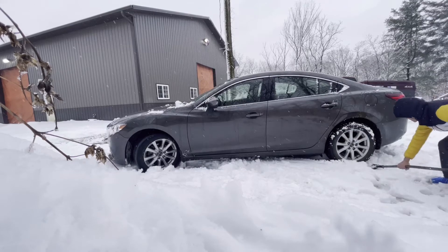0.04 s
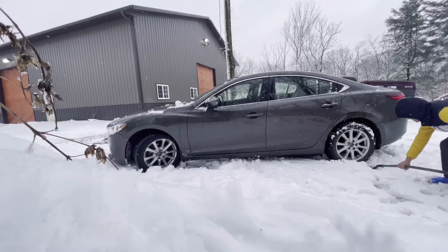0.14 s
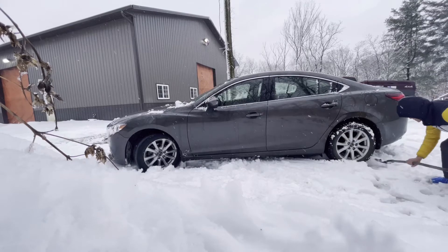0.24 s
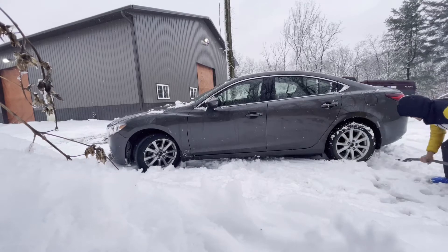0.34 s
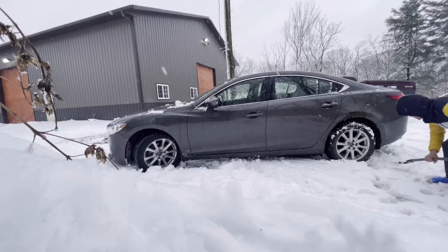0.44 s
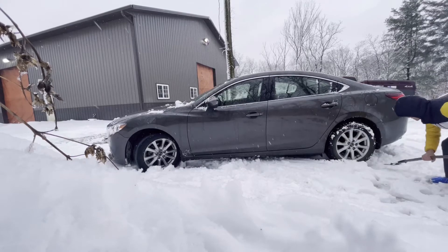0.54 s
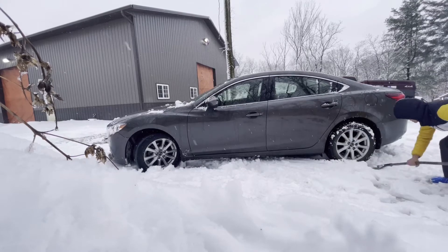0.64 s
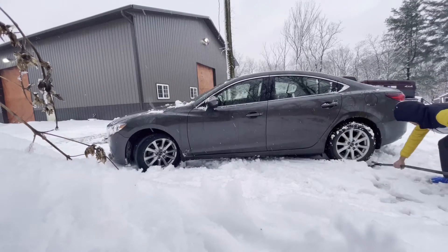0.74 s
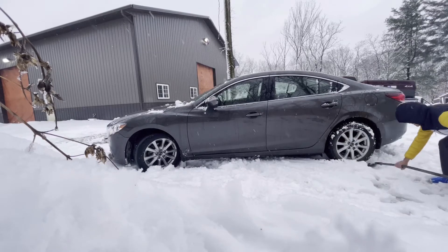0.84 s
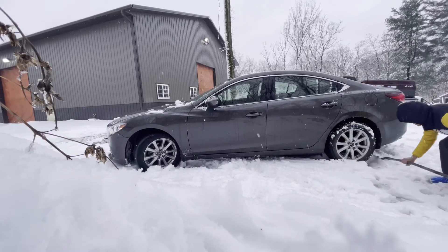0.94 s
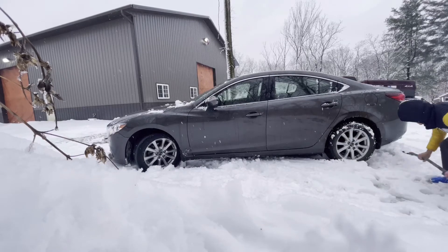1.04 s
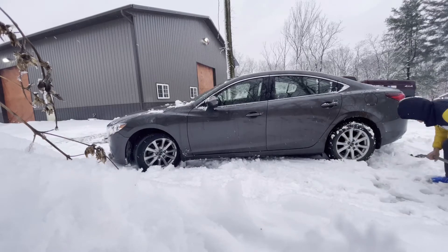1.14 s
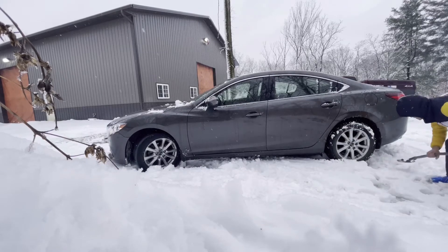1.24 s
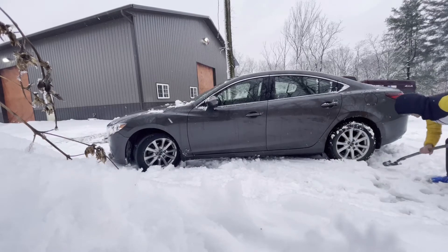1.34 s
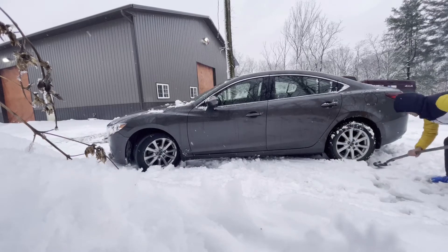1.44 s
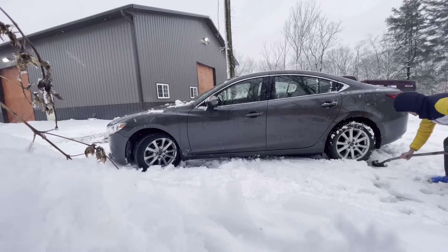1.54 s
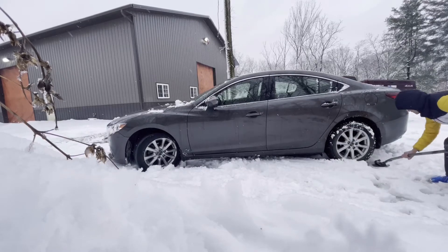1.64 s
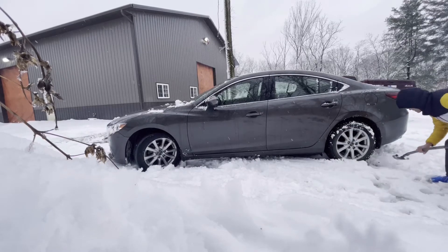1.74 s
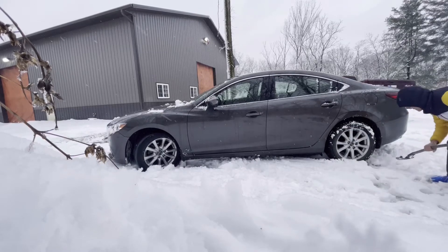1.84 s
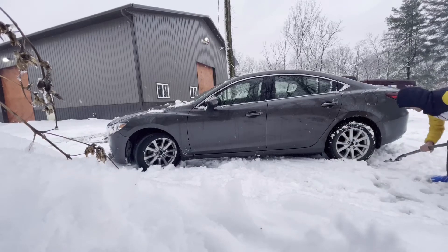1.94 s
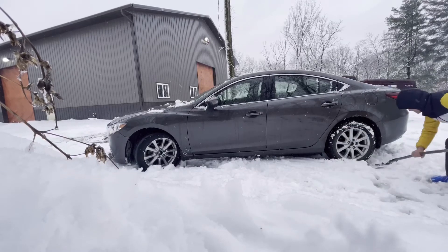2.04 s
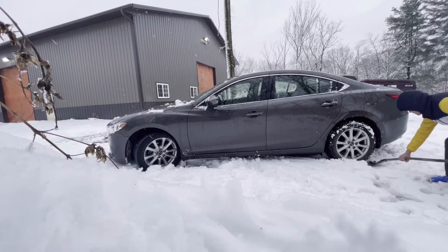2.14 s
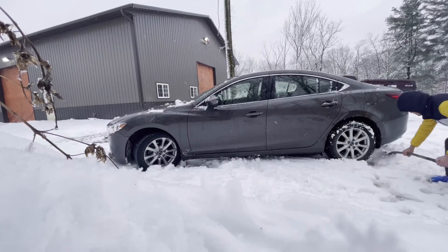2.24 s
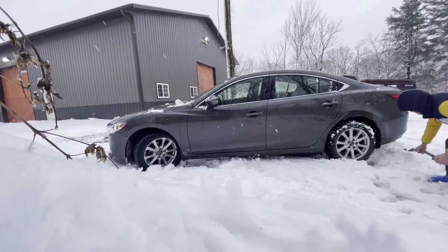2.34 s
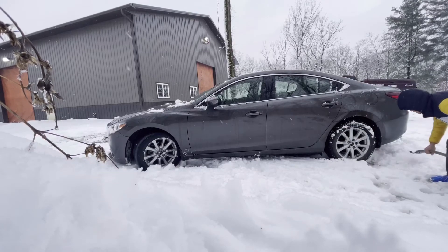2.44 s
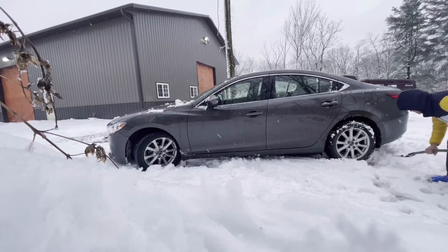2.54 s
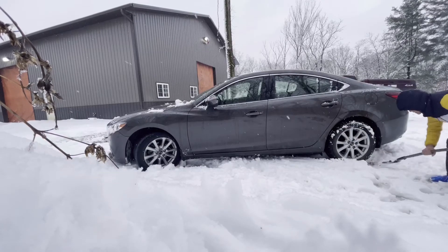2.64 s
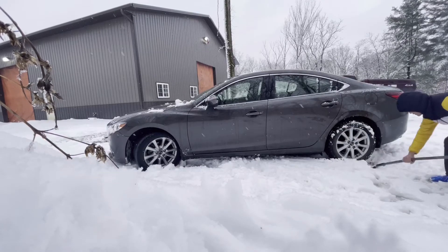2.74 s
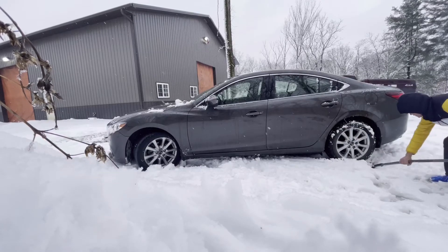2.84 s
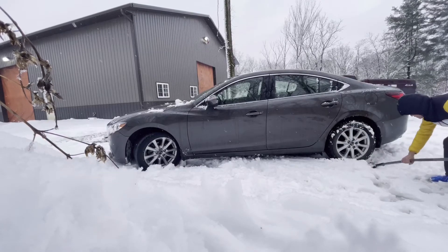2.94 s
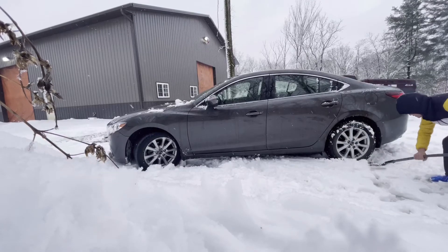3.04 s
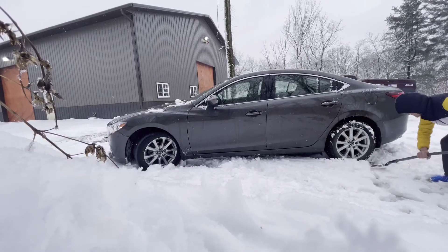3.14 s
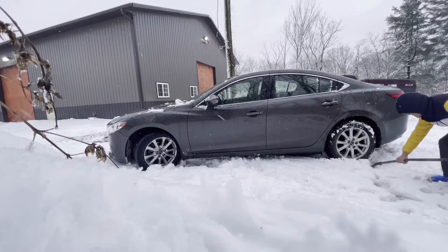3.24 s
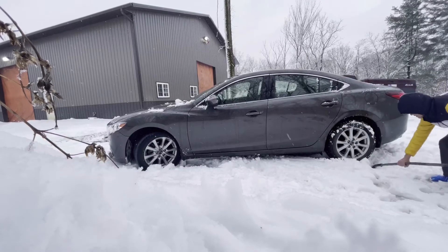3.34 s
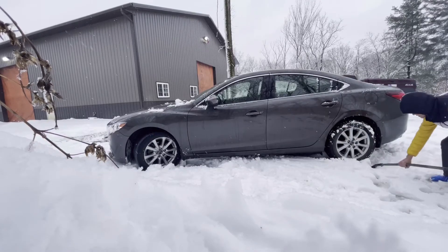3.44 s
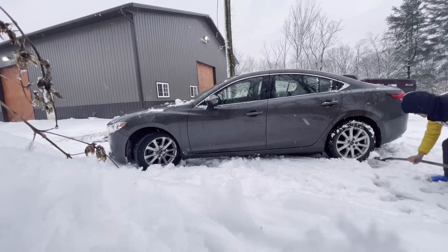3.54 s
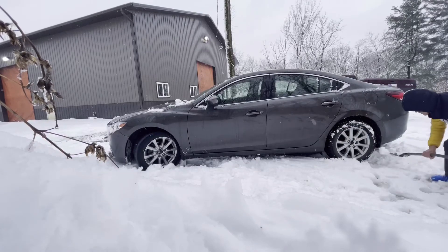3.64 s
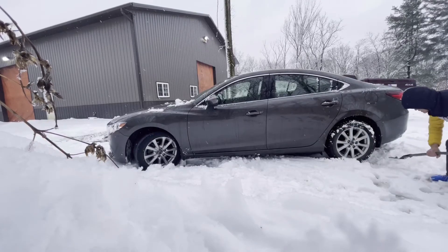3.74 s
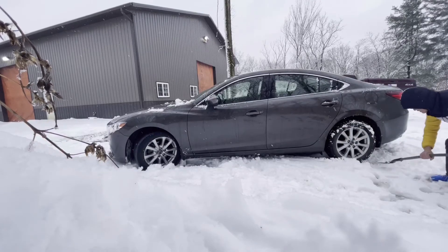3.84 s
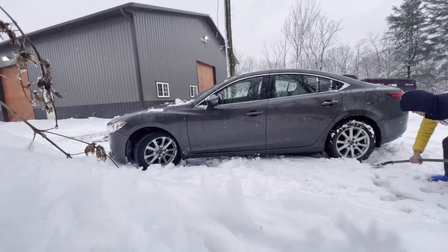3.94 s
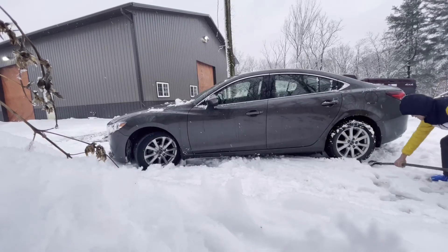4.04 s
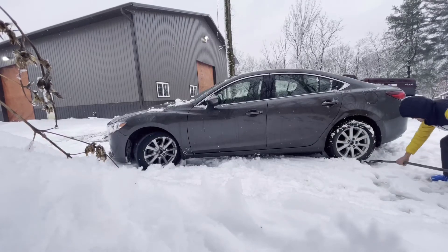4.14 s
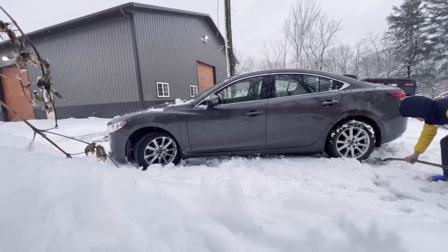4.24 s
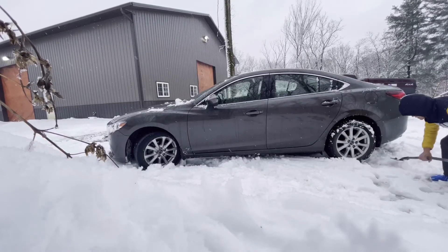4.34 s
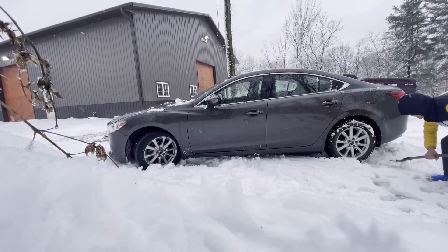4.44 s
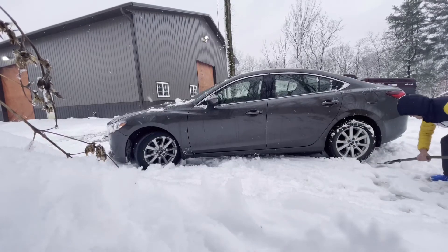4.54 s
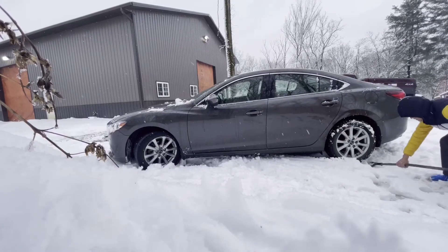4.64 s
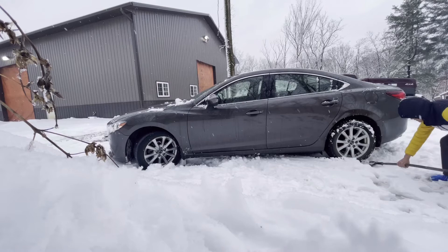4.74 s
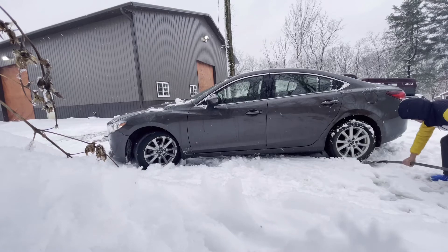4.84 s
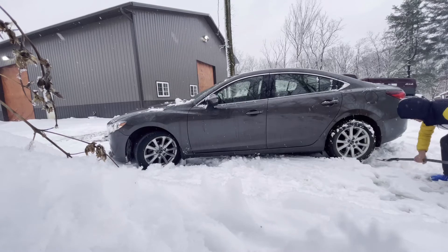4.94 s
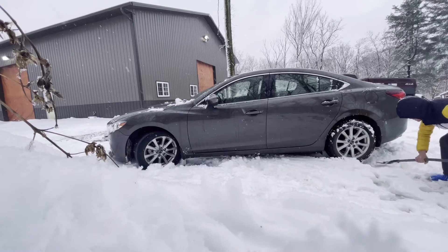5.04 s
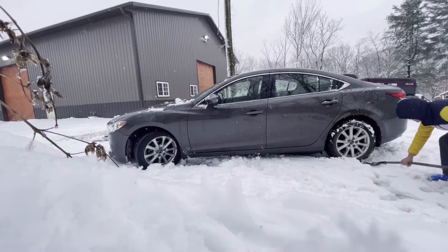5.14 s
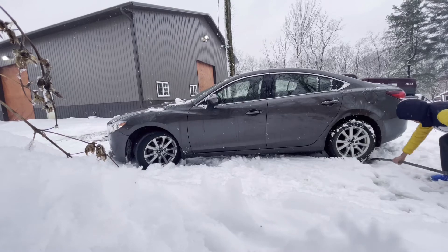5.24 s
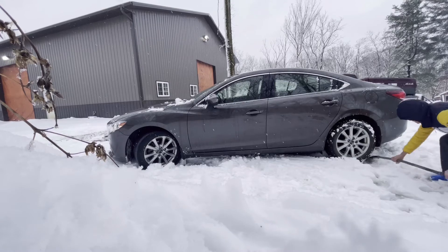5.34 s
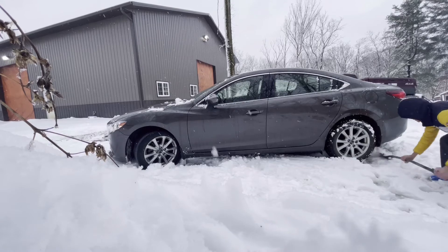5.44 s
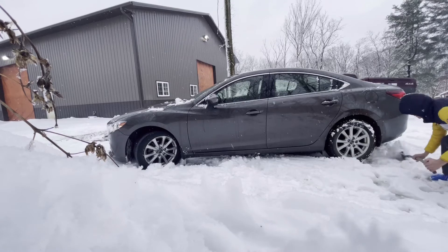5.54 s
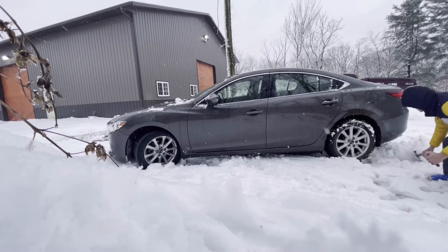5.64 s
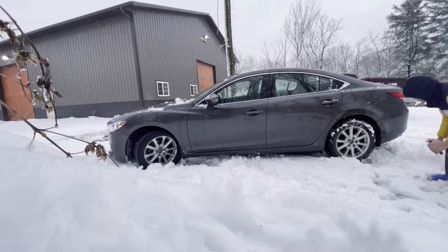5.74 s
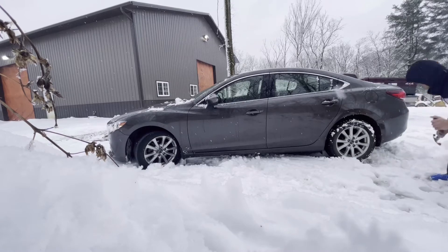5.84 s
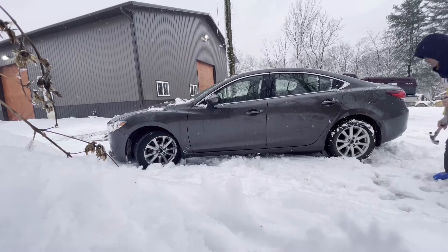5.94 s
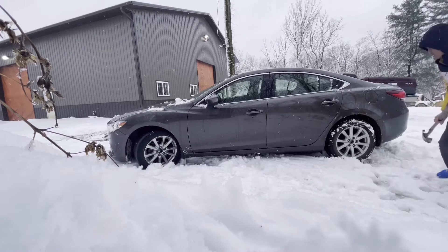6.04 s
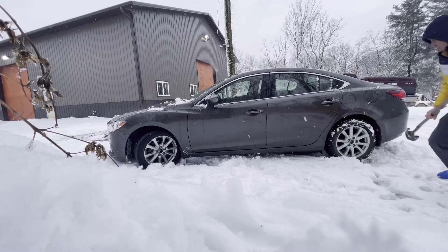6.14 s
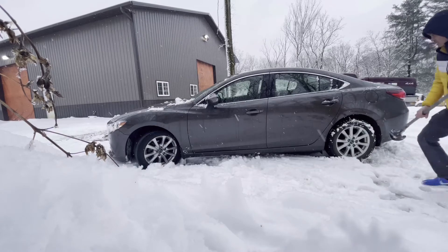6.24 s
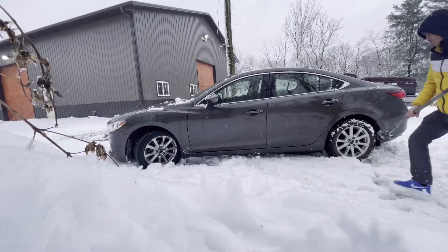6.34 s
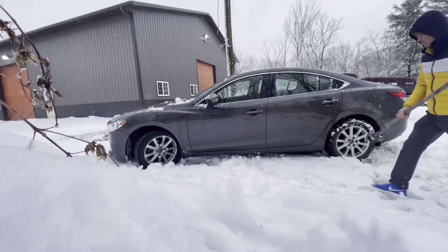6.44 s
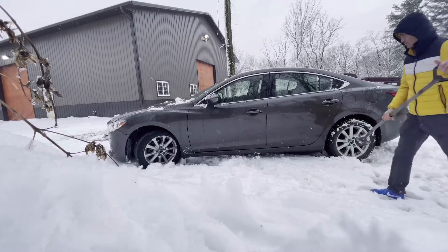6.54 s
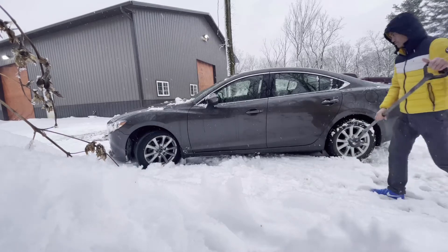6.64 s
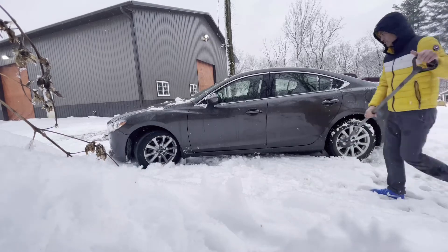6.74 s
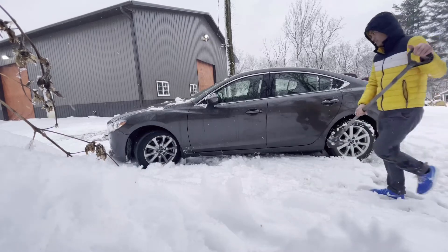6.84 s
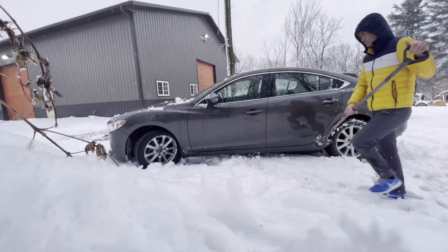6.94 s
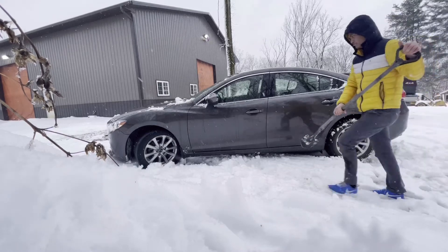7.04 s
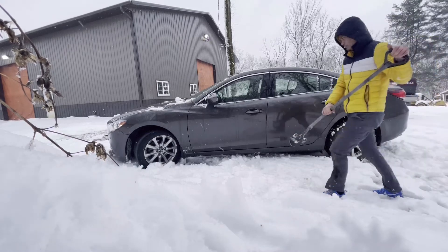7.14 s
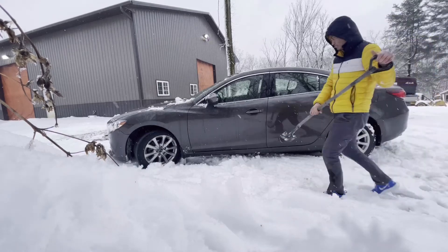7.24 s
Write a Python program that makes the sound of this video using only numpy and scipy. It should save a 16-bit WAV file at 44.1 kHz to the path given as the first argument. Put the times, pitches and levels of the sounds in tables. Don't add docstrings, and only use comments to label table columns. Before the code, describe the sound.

A metal shovel chops and scrapes packed snow beside a car idling with a low steady rumble, then muffled boots step past.

```python
import sys
import numpy as np
from scipy import signal
from scipy.fft import rfft, irfft
from scipy.io import wavfile

SR = 44100
rng = np.random.default_rng(int(sys.argv[2]) if len(sys.argv) > 2 else 0)


def master(y):
    cut = np.clip(np.atleast_2d(y).T, -1, 1)
    pcm = np.round(cut * 32767)
    wavfile.write(sys.argv[1], SR, pcm.astype(np.int16))


def amplitude_ratio(level_db):
    exponent = np.asarray(level_db, float) / 20
    return 10 ** exponent


N = 321048
CLOCK = np.arange(N) / SR
HZ = np.maximum(np.arange(N // 2 + 1) * SR / N, 1)


def rms_one(x):
    return x / np.sqrt(np.mean(x ** 2) + 1e-20)


def in_time(rows):
    s, *columns = np.transpose(rows)
    return [np.interp(CLOCK, s, c) for c in columns]


def over_hz(rows):
    hz, *columns = np.transpose(rows)
    return [np.interp(np.log(HZ), np.log(hz), c) for c in columns]


def colour(x, spectrum):
    gain = amplitude_ratio(over_hz(spectrum)[0])
    return rms_one(irfft(rfft(x) * gain, N))


def drift(rate):
    knots = rng.standard_normal(int(N / SR * 40) + 2)
    return np.interp(CLOCK * min(rate, 39), np.arange(len(knots)), knots)


def resonate(x, modes):
    out = 0
    for k, (hz, width_hz, level_db) in enumerate(modes):
        r = np.exp(-np.pi * width_hz / SR)
        gain = (-1) ** k * amplitude_ratio(level_db) * np.sqrt(1 - r * r)
        feedback = [1, -2 * r * np.cos(2 * np.pi * hz / SR), r * r]
        out = out + signal.lfilter([gain, 0, -gain], feedback, x)
    return out


def grains(per_s, spread_db):
    sizes = amplitude_ratio(spread_db * np.minimum(rng.exponential(1, N), 5)) * rng.choice([-1, 1], N)
    return rms_one(sizes * (rng.random(N) < per_s / SR))


def burst(rise, t60):
    age = CLOCK[:SR // 3]
    swell = np.clip(age / max(rise, 3e-4), 0, 1) ** 3.0
    return swell * amplitude_ratio(-60 * np.maximum(age - rise, 0) / max(t60, .005))


def add(out, s, x):
    at = round(s * SR)
    out[..., at:at + x.shape[-1]] += x[..., :N - at]


def thuds(table):
    out = np.zeros(N)
    for s, peak_db, hz, t60 in table:
        around = [(min(1.244 * hz, 16000), 1.04 * hz, 0)]
        noise = rng.standard_normal(SR // 3)
        puff = rms_one(resonate(resonate(noise, around), around)) * burst(0, 0.22)
        swing = np.sin(2 * np.pi * hz * CLOCK[:SR // 3])
        add(out, s, amplitude_ratio(peak_db) * burst(1.19 / hz, t60) * (0.83 * swing + 0.34 * puff))
    return out


def ports(near, other, table):
    alike, lead, left_db = over_hz(table)
    alike = np.clip(alike, 0, 1)
    right = rfft(near)
    left = (alike * right + np.sqrt(1 - alike ** 2) * rfft(other)) * np.exp(1j * lead)
    return irfft([left * amplitude_ratio(left_db / 2), right * amplitude_ratio(-left_db / 2)], N)


# (time [s], firings [per s], fan hum [Hz])
IDLE_SPEED = [(0, 27.5, 74.42), (.9, 27.5, 74.42), (1.6, 27.28, 74.15), (2.3, 27.1, 74.05),
              (3.0, 27.28, 74.2), (3.7, 27.5, 74.4), (4.3, 27.55, 74.42), (6.0, 27.48, 74.38),
              (7.28, 27.6, 74.48)]
# (multiple [x], level [dB rms])
FIRING_TONES = [(1, -44), (2, -55.5), (3, -36.5), (4, -76), (5, -58), (6, -52), (7, -59.5)]
# (frequency [Hz], level [dB per Hz])
RUMBLE_SPECTRUM = [(20, -25), (42, -22), (52, -4), (110, -2.5), (200, -4.5), (350, -16), (700, -25.5),
                   (1000, -31.5), (1700, -31.5), (2500, -35.5), (3800, -39), (5000, -38), (8000, -41.5),
                   (14000, -44)]
# (frequency [Hz], likeness [0-1], left lead [radians], left-right level [dB])
CAR_AT_PORTS = [(59.7, 0.83, 0.76, 1), (332, 0.94, -0.46, 2.5), (500, 0.15, 1.7, -2), (655, 0.22, 0.3, 3.5),
                (1150, 0.069, 2.5, 7.5), (1690, 1, 1.24, 5.5), (2080, 0.51, 3, -2), (2980, 0.98, 4, 4.5),
                (4180, 0.79, 4.5, 1.5), (6450, 0.14, 7.5, 6), (7800, 0.12, 6.5, 2), (10050, 0.51, 11, -4.5),
                (11460, 0.7, 7.5, 2.5), (13600, 0.85, 2 * np.pi, -0.5)]


def car():
    firing, fan = in_time(IDLE_SPEED)
    crank = 2 * np.pi * (np.cumsum(firing) / SR - .07)
    tones = sum(amplitude_ratio(db + 3 + 0.55 * k * drift(1.526)) * np.cos(k * crank) for k, db in FIRING_TONES)
    fan_turn = 2 * np.pi * (np.cumsum(fan) / SR + .48)
    tones += amplitude_ratio(-43 + 1.8 * drift(7.3)) * np.cos(fan_turn)
    tones += amplitude_ratio(-55.5) * np.cos(3 * fan_turn)
    throb = 1 + 0.054 * np.cos(crank)
    near, other = [amplitude_ratio(-38.5) * throb * colour(rng.standard_normal(N), RUMBLE_SPECTRUM) for side in "ab"]
    return ports(near, other, CAR_AT_PORTS) + tones * amplitude_ratio([[.3], [-.3]])


# (time [s], thud level [dB], thud pitch [Hz], crust level [dB])
FOOTFALLS = [
    (5.807, -29.5, 520, -34.5),
    (5.965, -46, 500, -50),
    (6.296, -29.5, 391, -44),
    (6.88, -37, 330, -42),
    (6.991, -28, 250, -44),
    (7.105, -42, 500, -52),
]
# (pitch [Hz], level [dB], t60 [s])
CRUST_CRACKS = [(560, -10, .03), (900, 0.8, 0.026), (1260, -0.5, 0.038)]


def boots():
    sole = [(s, db, hz, .045) for s, db, hz, crust_db in FOOTFALLS]
    crust = [(s + .003, crust_db + db, hz, t60)
             for s, _, _, crust_db in FOOTFALLS for hz, db, t60 in CRUST_CRACKS]
    muffle = signal.butter(3, 1700, fs=SR, output="sos")
    return signal.sosfilt(muffle, thuds(sole + crust))


# (time of peak [s], crunch level [dB], swell [s], knock level [dB rel.], blade ring [dB])
HARD_CHOPS = [
    (.63, -9.5, 0.015, -6, -4),
    (1.431, -4.5, 0.0026, -4, 3.5),
    (1.443, -12, 0.0099, -2, -9),
    (2.056, -3.5, 0.0088, -8, 0),
    (2.075, -7, 0.0049, 1, 1),
    (2.735, -15.5, 0.018, -5, -11),
    (3.167, -10.5, 0.019, -4.5, 3),
    (3.955, -9, 0.0082, -6, -11),
    (4.585, -12, 0.0078, 0, -21),
    (5.095, -7.5, .006, -7, -3),
]


def chops():
    return [(s, db, knock_db, ring_db, rise, .038) for s, db, rise, knock_db, ring_db in HARD_CHOPS]


# (time of peak [s], level [dB], swell [s], t60 [s])
EDGE_SLICES = [(.12, -30, 0.11, .14), (.626, -18.5, 0.015, 0.037), (1.402, -30, .0065, .08),
               (2.04, -38, .03, 0.11), (2.698, -29, 0.016, .076), (2.712, -23.5, .015, 0.11),
               (3.153, -22.5, 0.028, 0.16), (3.968, -21, 0.0099, 0.17), (4.037, -30, 0.046, 0.027),
               (4.593, -18.5, 0.0088, 0.083), (5.085, -17.5, 0.021, 0.11), (5.426, -30, 0.12, 0.13),
               (5.458, -23.5, 0.037, 0.066), (7.0, -46, .021, .18)]


def slices():
    return [(s, db, -13, -0.5, rise, t60) for s, db, rise, t60 in EDGE_SLICES]


# (time of peak [s], level [dB], blade ring [dB])
CRUST_BRUSHES = [(.875, -54, 11), (1.42, -21, 6.5), (1.475, -31, 11.5), (1.566, -35, 8), (1.582, -27.5, 4),
                 (1.596, -25.5, 6.5), (1.64, -51, 16), (3.489, -43, 7.5), (4.152, -53, 21),
                 (4.188, -53.5, 18), (4.202, -47.5, 19), (4.328, -45, 9.5), (5.276, -49, 11)]


def brushes():
    return [(s, db, -18, ring_db, 0.02, 0.072) for s, db, ring_db in CRUST_BRUSHES]


# (time of peak [s], level [dB], knock level [dB rel.])
LEVER_SHUDDERS = [
    (2.107, -23.5, -12),
    (2.258, -43, -5),
    (5.141, -22.5, -6.5),
    (5.2, -33, -11),
    (5.347, -43, -16),
]


def shudders():
    return [(s, db, knock_db, 7, 0.042, .09) for s, db, knock_db in LEVER_SHUDDERS]


# (time [s], level [dB], knock level [dB rel.])
LIGHT_TICKS = [(.004, -36, -5), (0.056, -41, -1.5), (.455, -54, -13), (.806, -33, -7), (.929, -24, -12.5),
               (0.97, -36, -8), (1.536, -37, -6), (2.223, -44, -1), (2.331, -49, -25), (2.398, -47, -21),
               (3.379, -33, -6), (3.402, -38.5, -10), (5.48, -40, 7.5), (5.533, -50, -11), (5.57, -55, -14),
               (5.652, -31.5, -16), (5.685, -46, -7), (6.147, -45, -14), (6.81, -41.5, -16)]


def ticks():
    return [(s, db, knock_db, -1, 0.0056, .055) for s, db, knock_db in LIGHT_TICKS]


# (start [s], scrape level [dB],
# length [s], fade [dB], low part [dB rel.])
SLIDES = [(.048, -50.5, 0.12, 21, -4.5), (0.627, -28.5, 0.14, 36, -8), (0.798, -53.5, 0.23, 12.5, -8),
          (1.453, -53, 0.23, 6.5, -5.5), (2.088, -46.5, 0.3, 16, -4.5),
          (2.702, -47.5, 0.12, 14.5, -12), (3.165, -46, 0.14, 24, 0), (3.35, -60, .18, 12, -3.5),
          (3.958, -34, 0.28, 38, -5), (4.589, -39.5, 0.17, 16.5, -3.5), (5.103, -41, 0.17, 7, -6),
          (5.244, -49, 0.34, 11, -12), (5.57, -65, 1, 8, -3), (6.75, -72.5, 0.51, -8, -3)]


def slides():
    scrape_db, low_db = np.full(N, -120.), np.zeros(N)
    for s, start_db, length, fade_db, part_db in SLIDES:
        inside = (CLOCK >= s) & (CLOCK <= s + length)
        scrape_db[inside] = start_db - fade_db * (CLOCK[inside] - s) / length
        low_db[inside] = part_db
    return scrape_db, low_db


def strokes():
    jabs = np.zeros((3, N))
    for s, peak_db, knock_db, ring_db, rise, t60 in chops() + slices() + brushes() + shudders() + ticks():
        parts = amplitude_ratio([[0], [ring_db], [knock_db]])
        add(jabs, max(s - rise, 0), parts * amplitude_ratio(peak_db - 11.5) * burst(rise, t60))
    scrape_db, low_db = slides()
    catching_db = np.array([2.0 * drift(30), -3 + 4.0 * drift(38), low_db + 2.3 * drift(25)])
    lumps = rng.standard_normal(1000)
    lump_db = 3.5 * np.interp(CLOCK * 70, np.arange(len(lumps)), lumps)
    return amplitude_ratio(0.28 * lump_db) * jabs + amplitude_ratio(scrape_db + catching_db + lump_db)


# (frequency [Hz], level [dB per Hz])
CRUNCH_SPECTRUM = [(1500, -13), (2500, -2), (4000, 3.5), (6500, 1.5), (9000, -1), (12500, -1.5),
                   (15000, -14), (17000, -63)]


def snow(crunch, knock):
    hiss = crunch * colour(grains(per_s=8800, spread_db=4.0), CRUNCH_SPECTRUM)
    packing = knock * rms_one(resonate(grains(per_s=3100, spread_db=4.5), [(1360, 3870, 0)]))
    return amplitude_ratio(1.5) * hiss + amplitude_ratio(6.0) * packing


def blade(force, modes):
    slips = force * grains(per_s=3500, spread_db=2.5) + 1e-18
    out = 0
    for k, mode in enumerate(modes):
        out = out + (-1) ** k * resonate(slips * amplitude_ratio(2.5 * drift(15)), [mode])
    return out


# (pitch [Hz], width [Hz], level [dB])
HIGH_MODES = [(2800, 160, -1), (4210, 330, -3), (5140, 100, -4.5), (5080, 210, 6), (6290, 88, 7),
              (6332, 48, 5), (6565, 100, 4.5), (6800, 80, -17), (8020, 260, -1.5)]
# (pitch [Hz], width [Hz], level [dB])
LOW_MODES = [(868, 11.5, -11.5), (1090, 57, 2), (1337, 83, -7), (1700, 40, -3.5), (1890, 240, 0),
             (2174, 110, 2.5), (2460, 240, -6.5)]


def metal(ring, knock):
    return amplitude_ratio(-11.0) * blade(ring, HIGH_MODES) + amplitude_ratio(-9.5) * blade(knock, LOW_MODES)


# (time [s], thump level [dB], thump pitch [Hz], handle knock level [dB], knock pitch [Hz])
DULL_BLOWS = [(.63, -20.5, 220, -10, 555), (1.431, -11.5, 167.6, -23.5, 419), (2.054, -19, 207, -17.5, 500),
              (2.074, -26, 167, -16.5, 572), (2.228, -23, 71.4, -60, 500), (2.252, -28.5, 72, -55, 500),
              (3.161, -9, 212, -6.5, 396), (3.953, -19.5, 194, -18.5, 498), (4.582, -17, 202, -14.5, 504),
              (5.095, -33, 258, -17.5, 500), (5.141, -19, 209, -50, 500), (5.212, -50, 210, -24.5, 446),
              (5.454, -21.5, 225, -56, 500)]


def blows():
    parts = []
    for s, thump_db, thump_hz, knock_db, knock_hz in DULL_BLOWS:
        parts.append((s, thump_db, thump_hz, 7.9 / thump_hz))
        parts.append((s, knock_db, knock_hz, 12.5 / knock_hz))
        parts.append((s, knock_db - 11.5, .68 * knock_hz, 0.099))
    return thuds(parts)


# (time [s], level [dB], pitch [Hz], t60 [s])
BLADE_CLANKS = [(1.43, -14, 1150, 0.028), (1.432, -17, 840, .022), (2.052, -22, 930, 0.025),
                (2.072, -15.5, 1207, .038), (2.073, -23, 1071, .15), (2.073, -13.5, 2148, 0.066),
                (2.085, -33, 2800, 0.23), (2.115, -37, 2190, .1), (2.1, -36, 5150, .09),
                (5.143, -29, 1083, .04), (4.036, -32, 480, .03), (2.218, -26, 1320, 0.042),
                (2.22, -33, 1584, 0.044), (2.225, -33.5, 1176, 0.056), (2.27, -46, 900, .074),
                (2.732, -25.5, 1316, 0.074), (3.162, -21.5, 900, 0.04), (3.164, -19.5, 797, 0.087),
                (3.164, -16.5, 1850, 0.042), (3.17, -25, 610, 0.084), (3.954, -22, 1360, .073),
                (4.586, -14.5, 1034, 0.028), (5.42, -36.5, 1570, .047)]


def clanks():
    return thuds(BLADE_CLANKS)


# (time [s], level [dB], pitch [Hz])
ICE_CHIPS = [(.454, -42, 13100), (1.398, -36, 6000), (1.4288, 2.1, 7120), (2.0745, -6, 6500),
             (2.397, -32, 12500), (2.402, -38, 12500), (2.409, -38, 12000), (5.0955, -20, 5870),
             (0.6295, -20, 8100), (4.583, -12, 7600), (3.955, -15, 6060)]


def chips():
    return thuds([(s, db, hz, 0.0069) for s, db, hz in ICE_CHIPS])


def ground(x):
    dip_hz, width_hz, dip_db = 2935, 1140, -2.5
    band = signal.lfilter(*signal.iirpeak(dip_hz, dip_hz / width_hz, SR), x)
    return x - (1 - amplitude_ratio(dip_db)) * band


def yard(x):
    dull = signal.lfilter([.4], [1, -.6], x)
    echoes = [(.011, -12), (.034, -17), (.062, -31)]
    return sum(amplitude_ratio(db) * np.pad(dull, (round(s * SR), 0))[:N] for s, db in echoes)


# (frequency [Hz], likeness [0-1], left lead [radians], left-right level [dB])
SHOVEL_AT_PORTS = [(77, 1, 0.8, -2), (413, 0.5, -0.8, 0), (724, 1, -2, 3.5), (900, 0, -3, -21),
                   (1091, 0.76, 8, -8), (1277, .9, -0.54, -8.5), (2270, 0.56, -2, 0.5), (2800, 0.35, -2, 5),
                   (3760, 0.51, -4, 3), (4700, 0.81, -4.5, 1.5), (6500, 0.23, -6, 12.5),
                   (8130, 1, -8.5, -2.5), (9900, 0, -7.5, 11.5), (12940, 0.92, -4 * np.pi, 1)]


def shovel():
    crunch, ring, knock = strokes()
    near = ground(snow(crunch, knock) + metal(ring, knock)) + blows() + clanks() + chips()
    other = np.roll(near, 157) - np.roll(near, 331)
    return ports(near + yard(near), 0.24 * other, SHOVEL_AT_PORTS)


def scene():
    return car() + boots() * amplitude_ratio([[-1.5], [1.5]]) + shovel()


def low_pass(x):
    return signal.sosfilt(signal.butter(12, 16650, fs=SR, output="sos"), x)


# (frequency [Hz], width [Hz], level [dB])
HOUSING_DIPS = [(5560, 560, -19), (7480, 550, -7.5), (11120, 260, 3.5)]


def record(dry):
    x = np.tanh(dry)
    for hz, width_hz, depth_db in HOUSING_DIPS:
        band = signal.lfilter(*signal.iirpeak(hz, hz / width_hz, SR), x)
        x = x - (1 - amplitude_ratio(depth_db)) * band
    x = signal.sosfilt(signal.cheby2(9, 45, 16150, fs=SR, output="sos"), x)
    return low_pass(x)


dry = scene()
out = record(dry)
master(out)
```